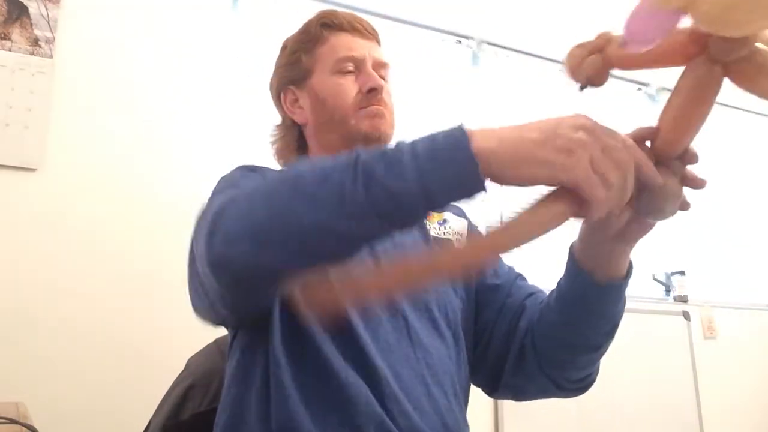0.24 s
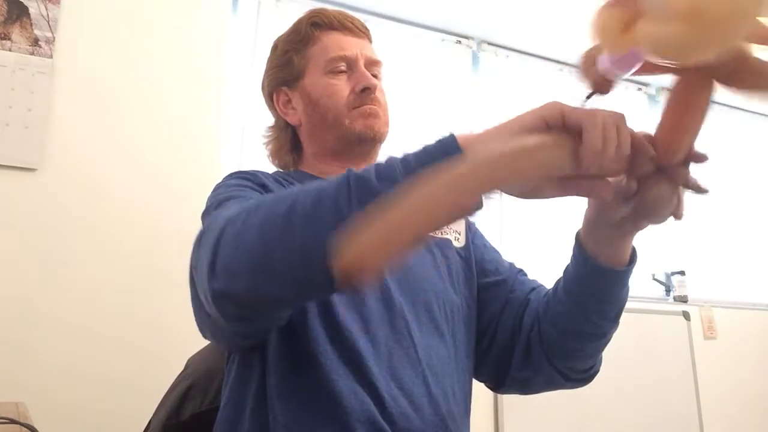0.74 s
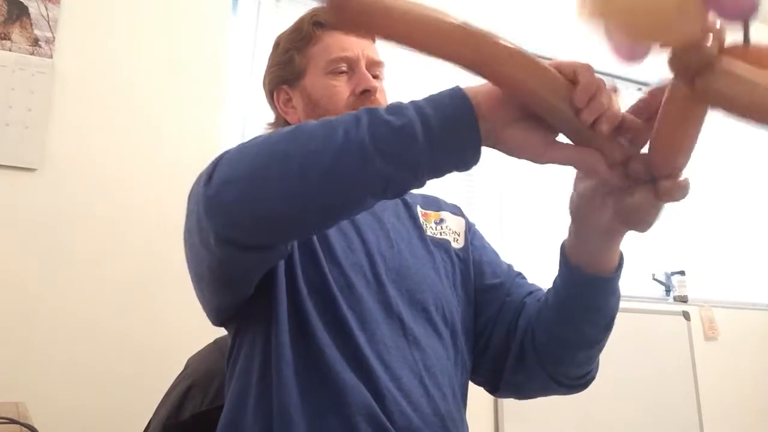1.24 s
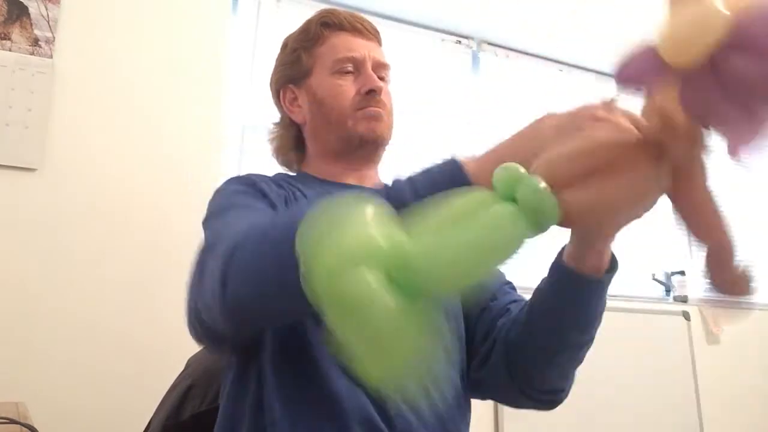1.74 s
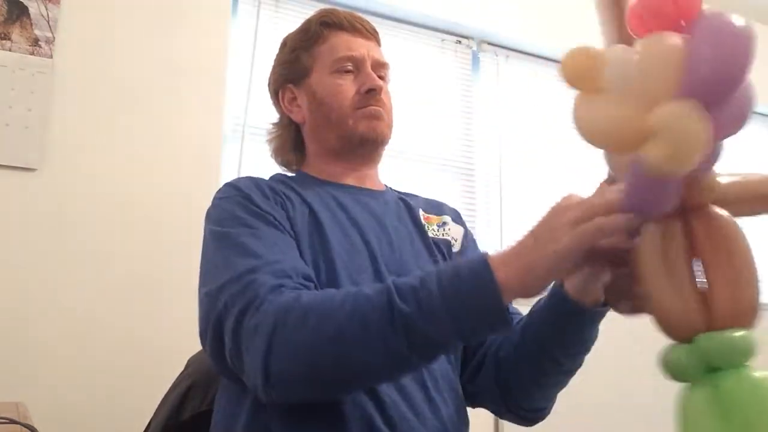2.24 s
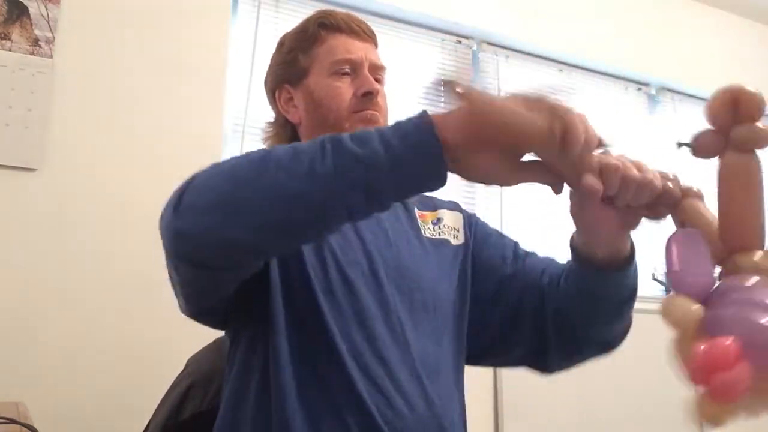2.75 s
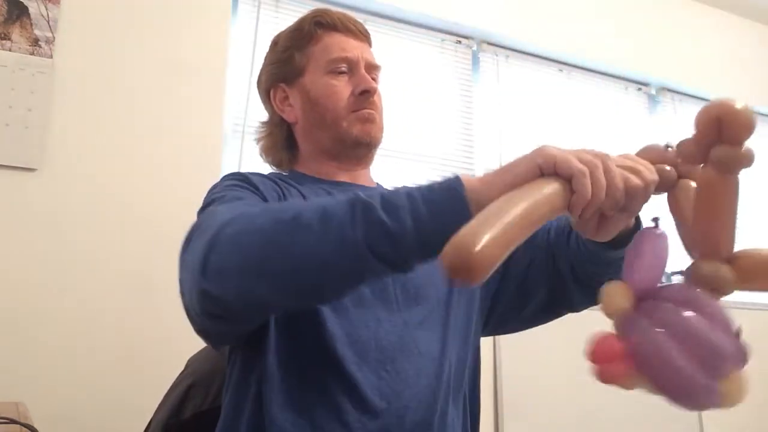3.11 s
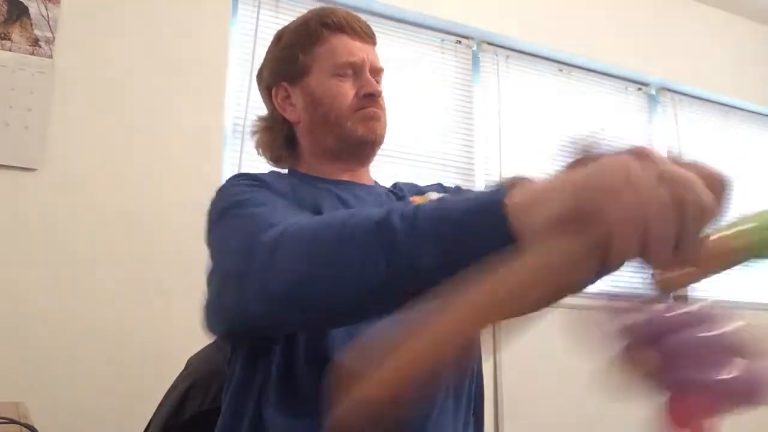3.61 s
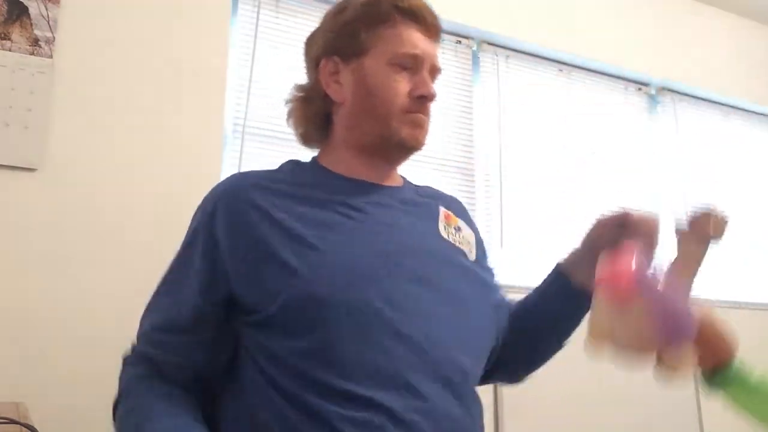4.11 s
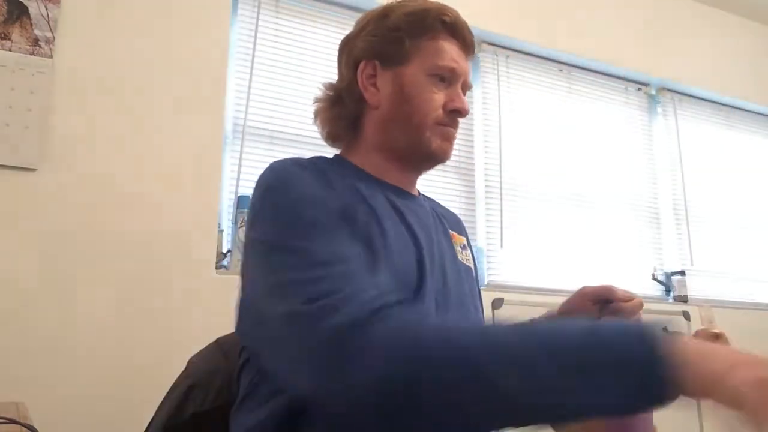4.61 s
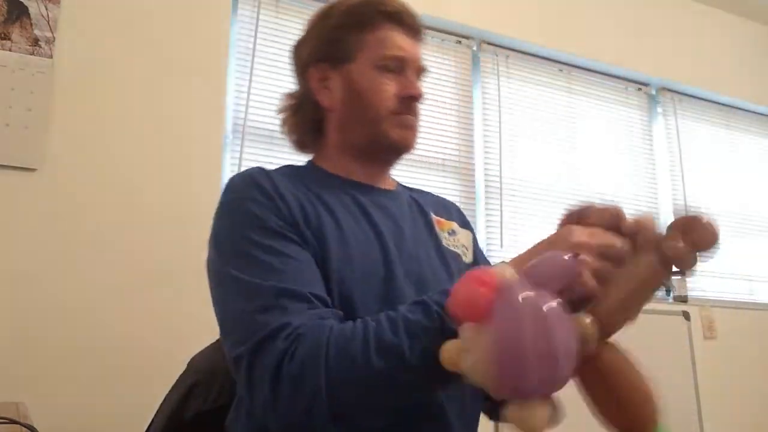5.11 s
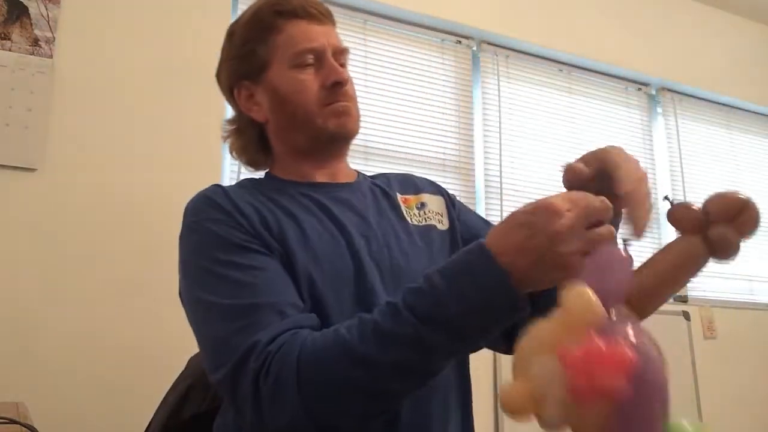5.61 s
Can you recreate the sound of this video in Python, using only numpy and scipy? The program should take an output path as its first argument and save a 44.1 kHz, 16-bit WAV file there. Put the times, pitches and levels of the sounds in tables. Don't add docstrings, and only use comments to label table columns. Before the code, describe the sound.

In a small bare room, a metre from a phone microphone, hands twist long latex balloons. Skins rub in gritty, hollow strokes with ticks, knocks and short skids. After a brief lull a tip tears with a loud snap, a tiny falling whistle is slapped shut, hard slaps and a tight creak follow, then softer rubbing and one last snap.

```python
import sys
import numpy as np
from scipy import signal
from scipy.fft import rfft, irfft
from scipy.io import wavfile
from scipy.ndimage import uniform_filter1d

SR = 44100
rng = np.random.default_rng(int(sys.argv[2]) if len(sys.argv) > 2 else 0)


def persist_wave(psi):
    counts = np.round(np.clip(psi, -1, 1) * 32767).astype(np.int16)
    wavfile.write(sys.argv[1], SR, np.atleast_2d(counts).T)


def linear_from_db(decibels):
    return 10 ** (np.asarray(decibels, float) / 20)


N = 258426
TIME = np.arange(N) / SR
TOP_HZ = 15350

# (f/Hz, width/Hz, level/dB)
SKIN = [(950, 340, -1), (1450, 234, 1), (1780, 225, 0.5), (2300, 594, -2), (3170, 640, -4)]


def level(x, db):
    return x * linear_from_db(db) / np.sqrt(np.mean(x ** 2))


def ring(x, hz, width_hz):
    return signal.lfilter(*signal.iirpeak(hz, hz / width_hz, fs=SR), x)


def body(x, modes):
    out = 0
    for k, (hz, width_hz, db) in enumerate(modes):
        out = out + (-1) ** k * linear_from_db(db) * ring(x, hz, width_hz)
    return out


def colour(x, points):
    hz, db = np.transpose(points)
    f = np.arange(len(x) // 2 + 1) * SR / len(x) + 1
    gain = linear_from_db(np.interp(np.log(f), np.log(hz), db))
    return irfft(rfft(x) * gain, len(x))


def low_cut(x, order, hz):
    return signal.sosfilt(signal.butter(order, hz, "high", fs=SR, output="sos"), x)


def walk(rate):
    hold = int(SR / rate)
    steps = np.clip(rng.standard_normal(N // hold + 1), -1.8, 1.4)
    return uniform_filter1d(np.repeat(steps, hold), hold)[:N]


def grit(size, scatter_db):
    strength_db = scatter_db * np.minimum(rng.exponential(size=size), 5)
    return level(rng.standard_normal(size) * linear_from_db(strength_db), 0)


def columns(table):
    s, *rest = np.transpose(table)
    return [np.interp(TIME, s, c) for c in rest]


def tubes(x):
    # (f/Hz, width/Hz, level/dB)
    tube_modes = [(208, 38, -0.5), (285, 29, 6), (430, 170, 2), (564, 113, 4), (700, 97, 0)]
    return low_cut(body(x, tube_modes), 3, 200)


def rub():
    # (t/s, resting pressure of skin on skin/dB, swing of the whole figure/dB)
    hands = [(0, -56, -3), (.45, -57.5, 0.5), (.6, -51.5, -3), (1.05, -53, -4.5), (1.2, -51, 0.5),
             (1.34, -63.5, 5), (1.56, -49.5, -1), (1.9, -51, 4), (2.4, -48.5, -5.5), (2.72, -64, 1.5),
             (2.8, -52, 3), (3.05, -55.5, -5.5), (3.4, -59.5, -3), (3.54, -98, 20), (3.63, -50, -10),
             (4.2, -59, 9.5), (4.7, -54, -11.5), (5.86, -61, 3)]
    # (peak t/s, peak level/dB, length/ms, weight on the tubes/dB)
    twists = [(.005, -50, 49, 9), (0.089, -44, 13, 12.5), (.17, -65, 73, 19), (.27, -56, 250, -16),
              (0.388, -49.5, 134, 2), (.7, -42, 23, 0), (.8, -53, 92, -6), (.96, -43.5, 73, -10),
              (1.055, -41.5, 210, 5.5), (1.102, -42.5, 66, 7), (1.131, -41, 40, 10.5),
              (1.44, -48, 150, 9.5), (1.63, -48.5, 150, 3.5), (1.84, -49.5, 210, -2),
              (2.02, -41.5, 84, 4.5), (2.27, -45.5, 130, -19), (2.39, -55.5, 260, 12),
              (2.89, -46.5, 170, -20), (2.97, -52, 110, 3), (3.12, -55.5, 89, -7), (3.22, -58.5, 67, 4),
              (3.35, -58, 85, -14), (3.62, -61.5, 260, -3), (3.67, -52.5, 130, 13), (4.05, -48, 180, 4.5),
              (4.16, -46, 26, -11), (4.25, -45, 54, 11), (4.82, -50, 120, -17), (4.99, -51, 210, 0),
              (5.185, -52, 125, 11.5), (5.235, -50.5, 43, 11.5), (5.31, -48.5, 67, -5),
              (5.43, -49, 250, -3), (5.74, -55, 170, -10)]
    # (f/Hz, level/dB per Hz)
    hiss_points = [(1800, -50), (3000, -6.5), (4200, -3), (6700, -9.5), (11000, -10), (14500, -16),
                   (15600, -20)]
    # (f/Hz, width/Hz, level/dB)
    drone_modes = [(59.6, 36, -8), (114.7, 20, -1)]
    rise, edge_db = 0.43, 13.5
    boom_db, hiss_db, drone_db = -3, -0.5, -10
    stroke_boom_db, stroke_hiss_db = -5.5, -0.5
    torn_s, slack_hiss_db = 3.9, -5
    swing_start_s, swing_end_s, long_tube_db = 0.28, 1.17, 7

    rest_db, swing_db = columns(hands)
    s, db, ms, weight_db = np.transpose(twists)[:, :, None]
    late = (TIME - s) * 1000 / ms
    shape_db = db - edge_db * np.maximum(-late / rise, late / (1 - rise))
    stroke = linear_from_db(np.max(shape_db, axis=0))
    shove = linear_from_db(np.max(shape_db + weight_db, axis=0))
    swung = np.clip(np.minimum(TIME - swing_start_s, swing_end_s - TIME) * 10, 0, 1)
    rest, flicker = linear_from_db(rest_db), linear_from_db(2.63 * walk(45))

    rustle = level(body(grit(N, 3.5), SKIN) * linear_from_db(1.6 * walk(25)), 0)
    boom = level(tubes(grit(N, 3.5)) * linear_from_db(2.8 * walk(20)), 0)
    hiss = level(colour(grit(N, 4.0), hiss_points) * linear_from_db(0.87 * walk(60)), 0)
    drone = level(body(body(grit(N, 3.5), drone_modes), drone_modes), 0)

    rustle = rustle * np.hypot(rest, stroke)
    boom = boom * linear_from_db(boom_db) * np.hypot(linear_from_db(swing_db) * rest, linear_from_db(stroke_boom_db) * shove)
    hiss_gain = linear_from_db(hiss_db + slack_hiss_db * (TIME > torn_s))
    hiss = hiss * hiss_gain * np.hypot(rest, linear_from_db(stroke_hiss_db) * stroke)
    drone_gain = linear_from_db(drone_db - 5.5 + 1.0 * swing_db + long_tube_db * swung)
    return flicker * (rustle + boom + hiss) + drone_gain * rest * drone


def slips(table, sharp, crack_hz, trim_db, skin_share):
    out, t = np.zeros(N + SR), np.arange(SR // 5) / SR
    crack_filter = signal.butter(2, [3300, min(crack_hz, TOP_HZ)], "band", fs=SR, output="sos")
    for s, db, hz, boom_db, crack_db, ms in table:
        fade = np.exp(-t / max(ms / 2000, 1e-4))
        burst = grit(len(t), 1.3) * fade + 5 * (t == 0)
        skin = ring(burst, hz, hz / sharp) + skin_share * body(burst, SKIN)
        crack = signal.sosfilt(crack_filter, burst)
        start = int(s * SR)
        for part, rel_db in ((skin, 0), (tubes(burst), boom_db), (crack, crack_db)):
            out[start:start + len(t)] += part / np.abs(part).max() * linear_from_db(db + rel_db + trim_db)
    return out[:N]


def small_slips():
    # (t/s, peak level/dB, ring f/Hz, crack re peak/dB)
    tick_table = [(0.02, -35.5, 1630, 10), (0.074, -21.5, 2020, -1.5), (0.925, -28.5, 3140, -4),
                  (0.924, -30, 1000, -13), (0.947, -25, 1600, -15), (1.002, -24.5, 1500, -9),
                  (1.031, -27, 2500, 0), (5.175, -36, 600, -15), (5.361, -36, 3100, -12),
                  (1.001, -27.5, 3400, -5), (1.007, -28, 2300, -3), (0.903, -30, 600, -11),
                  (0.96, -34, 3800, -2), (1.54, -28, 890, -13), (1.559, -29, 3200, -19),
                  (0.089, -28.5, 3300, -12), (0.185, -24.5, 690, -5), (0.257, -35, 4800, 5),
                  (0.296, -25, 2200, -0.5), (0.647, -28.5, 1970, -2), (0.947, -21, 3670, 6),
                  (1.294, -33, 3010, 4.5), (2.219, -26.5, 950, -17), (2.27, -27, 2100, -11),
                  (2.57, -30, 3800, -9), (2.779, -29, 1530, 14.5), (4.159, -35, 2110, 13.5),
                  (4.257, -23, 3300, -9), (4.274, -25, 2800, -5), (4.791, -28.5, 1800, -31),
                  (3.494, -55, 9000, 0), (3.564, -43, 5150, 1), (3.608, -42, 8000, 0),
                  (3.62, -29, 4370, -6), (1.965, -48, 4200, -6), (4.615, -33, 2400, -19),
                  (4.683, -32, 2600, -16), (4.741, -37, 2000, -8), (4.809, -39, 1790, -15),
                  (0.03, -31, 1700, -3), (0.05, -41, 1500, -6), (0.265, -34, 4800, 4),
                  (1.521, -30.5, 1500, -12), (4.563, -29.5, 3000, -25), (4.587, -32, 2500, -14),
                  (5.442, -42, 3000, -5), (5.468, -28, 830, -13), (5.474, -42, 1500, -12)]
    # (t/s, peak level/dB, ring f/Hz, length/ms)
    knock_table = [(0.002, -25, 1650, 2.3), (0.555, -37, 1370, 6), (0.704, -31.5, 1250, 4.9),
                   (0.833, -34, 1910, 2), (1.134, -33, 1920, 6), (1.611, -28, 3370, 16),
                   (1.81, -28, 1780, 29), (1.888, -30, 725, 21), (1.995, -21.5, 1940, 8),
                   (2.023, -31.5, 1730, 7.9), (2.084, -26.5, 910, 3.6), (2.418, -28, 1720, 20),
                   (4.031, -20, 1450, 5), (4.04, -34, 700, 6.1), (4.188, -29, 2490, 7.5),
                   (4.188, -38, 520, 11), (5.748, -36.5, 3120, 7.4), (5.819, -36, 1800, 4.8)]
    # (t/s, peak level/dB, ring f/Hz, length/ms)
    flick_table = [(0.219, -30, 1460, 15), (0.352, -29.5, 3550, 17), (0.493, -32, 1410, 7.7),
                   (0.665, -24.5, 2080, 2.2), (1.36, -36, 900, 7.4), (1.468, -36.5, 3900, 27),
                   (1.468, -33.5, 1590, 55), (1.72, -42, 3200, 35), (5.42, -39, 1600, 33),
                   (5.852, -34, 1410, 13), (1.688, -26.5, 2390, 35), (2.678, -45, 2650, 7.5),
                   (2.751, -37.5, 1700, 3.5), (2.875, -28, 1870, 15), (2.956, -28, 1450, 7.3),
                   (3.111, -33, 880, 7.9), (4.255, -22, 880, 23), (4.24, -33, 800, 15),
                   (4.879, -29, 1800, 12), (2.895, -32.5, 1750, 34), (2.985, -31, 1300, 11)]
    # (t/s, peak level/dB, ring f/Hz, boom re peak/dB)
    skid_table = [
        (0.689, -26, 2100, -19),
        (1.031, -34, 2390, -1),
        (1.124, -30.5, 1820, -18),
        (2.013, -22.5, 1790, -25),
        (2.378, -29.5, 1820, -17),
        (5.027, -26.5, 820, -20),
        (5.033, -28.5, 750, -24),
        (5.169, -51, 703, 14),
        (5.297, -30, 1400, -10),
        (5.358, -31.5, 1800, -3),
    ]
    ticks = [(s, db, hz, -19, crack_db, 3.2) for s, db, hz, crack_db in tick_table]
    knocks = [(s, db, hz, -8, -15, ms) for s, db, hz, ms in knock_table]
    flicks = [(s, db, hz, -17, -15.5, ms) for s, db, hz, ms in flick_table]
    skids = [(s, db, hz, boom_db, -43, 22) for s, db, hz, boom_db in skid_table]
    short = slips(ticks + knocks + flicks, sharp=3.6, crack_hz=13800, trim_db=-6.5, skin_share=0.41)
    return short + slips(skids, sharp=3.4, crack_hz=7200, trim_db=-7.0, skin_share=0.46)


def thuds():
    # (t/s, peak level/dB, f/Hz, ring/ms)
    bumps = [(0.081, -44, 60, 60), (2.751, -28.5, 300, 27), (3.63, -27, 110, 25), (3.904, -14, 240, 40),
             (3.907, -36, 90, 130), (4.031, -34, 202, 27), (4.286, -18.5, 320, 50), (4.324, -26, 305, 220),
             (5.503, -15.5, 850, 36), (0.838, -42, 520, 45), (1.41, -44, 680, 60), (0.019, -40, 450, 30),
             (0.05, -44, 450, 25), (4.283, -38, 90, 190), (5.172, -43, 120, 70), (5.185, -40, 65, 80),
             (5.505, -41, 170, 60), (4.371, -45, 75, 140), (5.505, -49, 65, 120), (5.503, -21, 560, 60),
             (1.37, -47, 62, 130), (2.48, -50, 190, 160), (1.42, -50, 200, 200), (1.78, -48, 290, 120),
             (0.128, -44, 300, 260), (4.63, -46, 480, 50)]
    out = np.zeros(N)
    for s, db, hz, ms in bumps:
        t = np.maximum(TIME - s, 0)
        out += linear_from_db(db - 60000 * t / ms) * np.sin(2 * np.pi * hz * t)
    return low_cut(out, 2, 45)


def chirps():
    # (t/s, f/Hz, level/dB, length/ms)
    squeaks = [(3.612, 7300, -53, 16), (4.878, 7050, -52, 14), (4.803, 1780, -48, 11),
               (4.816, 1760, -46, 22), (4.84, 1780, -59, 60), (3.552, 5180, -73, 60), (4.17, 3300, -63, 30),
               (4.214, 3300, -59, 40), (4.335, 1600, -41, 55), (4.36, 4800, -31, 36),
               (4.355, 3750, -35, 40), (4.335, 5850, -35, 35), (5.47, 1400, -42, 16),
               (5.485, 1150, -39, 16), (5.515, 900, -37, 22), (5.54, 870, -41, 40), (5.6, 980, -54, 60),
               (0.42, 1250, -57, 70), (4.97, 2450, -55, 30), (3.31, 1880, -58, 50), (4.156, 3300, -37, 9),
               (4.328, 1130, -26, 30), (4.41, 1080, -32, 62), (4.42, 5230, -40, 25)]
    out = np.zeros(N)
    wobble = np.cumsum(1 + .03 * walk(250))
    grip = linear_from_db(5 * walk(200))
    for s, hz, db, ms in squeaks:
        shape = np.clip(np.minimum((TIME - s) / .003, (s - TIME) * 2000 / ms + 2), 0, 1)
        out += linear_from_db(db) * shape * grip * np.sin(2 * np.pi * hz * wobble / SR)
    return out


def snaps():
    # (t/s, peak level/dB, ring f/Hz, crack re peak/dB, length/ms)
    rip_table = [(3.631, -7.5, 10300, 0.5, 5.9), (3.639, -11.5, 9300, -3.5, 46),
                 (3.646, -20.5, 1990, -7, 11), (3.651, -16, 4700, 1.5, 55), (3.908, -12, 2270, 6.5, 21.4),
                 (4.301, -31, 2800, -3, 14), (4.296, -21.5, 950, 6.5, 39), (4.385, -16, 4670, -12, 5.7),
                 (4.392, -15.5, 1080, 0.5, 11.5), (5.504, -10, 2460, -5, 3.4), (5.519, -33.5, 3060, 14, 13)]
    # (t/s, peak level/dB, ring f/Hz, boom re peak/dB, length/ms)
    slap_table = [(3.904, -16, 1100, -1.5, 4.7), (4.277, -10, 2690, -7, 21), (4.277, -18.5, 4430, -20, 18),
                  (4.279, -13, 6400, -28, 13), (4.288, -7, 860, -14, 9), (4.310, -17, 2550, -11, 4.9),
                  (4.47, -20.5, 640, -26, 6), (4.485, -19, 640, -47, 5.3), (4.485, -20, 3800, -42, 13),
                  (5.472, -29.5, 1370, -14, 39), (5.487, -26, 1070, -6, 40), (5.504, -13.5, 736, -28, 7.7),
                  (3.906, -14.5, 2950, -30, 19)]
    rips = [(s, db, hz, -26, crack_db, ms) for s, db, hz, crack_db, ms in rip_table]
    slaps = [(s, db, hz, boom_db, -30, ms) for s, db, hz, boom_db, ms in slap_table]
    return slips(rips + slaps, sharp=5.0, crack_hz=13200, trim_db=-1.5, skin_share=0.33)


def whistle():
    start_s, shut_s, open_ms, close_ms = 3.831, 3.907, 2.5, 7.5
    part = np.clip((TIME - start_s) / (shut_s - start_s), 0, 1)
    hz = 6595 - 550 * part - 2000 * part ** 3.5
    db = -13.2 - 430 * np.maximum(3.89 - TIME, 0)
    second_db = -10 + 5.0 * part - 15 * part ** 12.0
    third_db = -42 + 25 * part
    phase = 2 * np.pi * np.cumsum(hz * (1 + 0.0024 * walk(400))) / SR
    tone = np.sin(phase)
    tone = tone + linear_from_db(second_db + 2.0 * walk(300)) * np.sin(2 * phase)
    tone = tone + linear_from_db(third_db) * np.sin(3 * phase)
    opening, closing = (TIME - start_s) * 1000 / open_ms, (shut_s - TIME) * 1000 / close_ms
    return tone * linear_from_db(db) * np.clip(np.minimum(opening, closing), 0, 1)


def creak():
    # (t/s, slip rate f/Hz, level/dB)
    twist = [
        (4.305, 565.6, -20),
        (4.318, 551, -26.5),
        (4.342, 541.6, -26),
        (4.357, 530, -23),
        (4.375, 535.7, -24.5),
        (4.392, 537, -23.5),
        (4.399, 534, -52),
    ]
    # (f/Hz, level/dB)
    creak_points = [(200, -32), (530, 8), (800, -22), (1070, 5.5), (1600, 1.5), (2100, -5.5), (3100, -13.5),
                    (3750, -2), (4200, -5.5), (4800, -10), (5400, -6.5), (5900, -2), (7000, -7),
                    (10000, -14.5), (15500, -31)]
    start_s, end_s = twist[0][0], twist[-1][0]
    hz, db = columns(twist)
    treble_db = -1.5 + 101 * np.clip(TIME - start_s, 0, .1)
    cycles = np.cumsum(hz * (1 + .013 * walk(300))) / SR
    pulses = np.diff(np.floor(cycles), prepend=0) * linear_from_db(2.0 * walk(330))
    scrape = rng.standard_normal(N) * np.exp(-(cycles % 1) / 0.38)
    spread = signal.chirp(np.arange(82) / SR, 100, 82 / SR, 17000)
    pulses = np.convolve(pulses, spread)[:N]
    sound = level(colour(level(pulses, 0) + level(scrape, -0.72), creak_points), 0)
    low = signal.sosfilt(signal.butter(2, 2800, fs=SR, output="sos"), sound)
    high = low_cut(sound, 2, 2800) * linear_from_db(2.5 * walk(900))
    return (low - linear_from_db(treble_db) * high) * linear_from_db(db) * ((TIME > start_s) & (TIME < end_s))


def nearby(x):
    # (delay/ms, level/dB)
    surfaces = [
        (3.4, -5),
        (8.6, -6),
        (11, -8),
    ]
    out = x
    for ms, db in surfaces:
        out = out + linear_from_db(db) * np.pad(x, (int(ms * SR / 1000), 0))[:N]
    return out


def walls():
    # (f/Hz, t/s)
    die_away = [(100, 0.33), (500, 0.22), (2000, 0.33), (3900, 0.28), (4750, 0.43), (5700, 0.32),
                (10000, 0.34), (16000, 0.25)]
    gap_s, build_s, echo_db = .005, .01, -1.5
    t = np.arange(int(.7 * SR)) / SR
    sparse = rfft(rng.standard_normal(len(t)) * (rng.random(len(t)) < .04 + (t / .025) ** 2))
    log_hz = np.log(np.arange(len(sparse)) * SR / len(t) + 1)
    hz, t60 = np.transpose(die_away)
    echo = 0
    for peak, s in zip(np.eye(len(hz)), t60):
        band = irfft(sparse * np.interp(log_hz, np.log(hz), peak), len(t))
        echo = echo + band * linear_from_db(-60 * t / s)
    echo = echo * np.clip((t - gap_s) / build_s, 0, 1)
    power = np.abs(rfft(echo)) ** 2
    even = np.sqrt(uniform_filter1d(power, size=1400) / uniform_filter1d(power, size=140))
    echo = irfft(rfft(echo) * even, len(t))
    return echo / np.sqrt(np.sum(echo ** 2)) * linear_from_db(echo_db)


def quiet_air():
    # (f/Hz, level/dB per Hz)
    air_points = [(12, -59), (20, 2), (106, -5), (202, -5), (239, -3.5), (770, -88), (935, -27),
                  (2770, -62), (5120, -25), (15600, -37)]
    return level(colour(rng.standard_normal(N), air_points), -64)


def scene():
    echo, rubbing, twist, squeal, squeaks = walls(), rub(), creak(), whistle(), chirps()
    loud = snaps() + squeal
    small = small_slips() + squeaks
    room = signal.fftconvolve(loud + small + 0.4 * twist + .5 * rubbing, echo)[:N]
    close = nearby(loud + 0.72 * small) + 0.69 * small
    return (close + twist + thuds() + rubbing + room + quiet_air())[None]


def low_pass(x):
    return signal.sosfilt(signal.butter(12, 16500, fs=SR, output="sos"), x)


def record(dry):
    lean = low_cut(dry, 2, 55)
    cut = signal.sosfilt(signal.ellip(12, .5, 45, TOP_HZ, fs=SR, output="sos"), lean)
    return low_pass(cut)


dry = scene()
out = record(dry)
persist_wave(out)
```